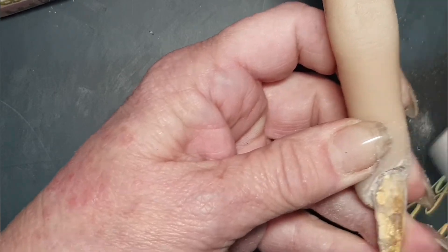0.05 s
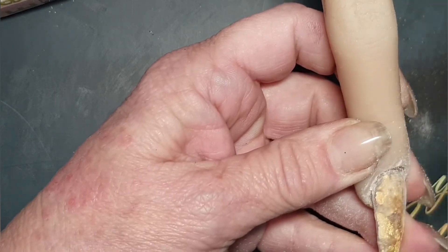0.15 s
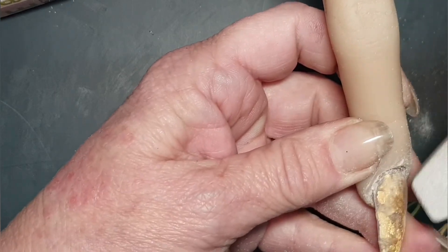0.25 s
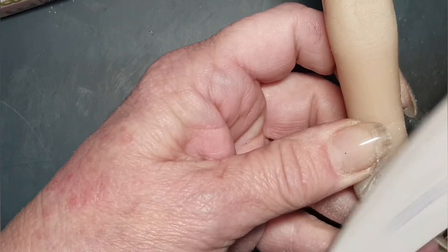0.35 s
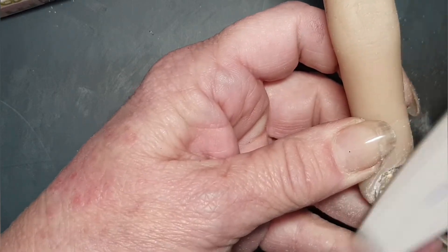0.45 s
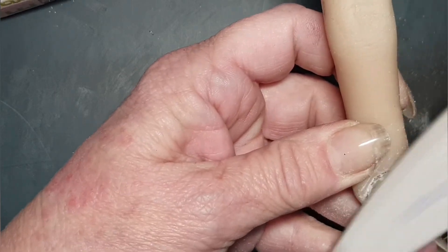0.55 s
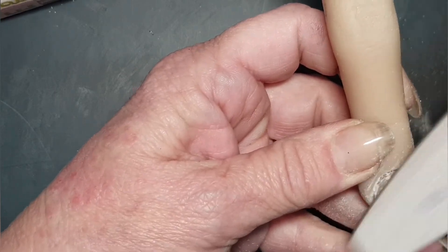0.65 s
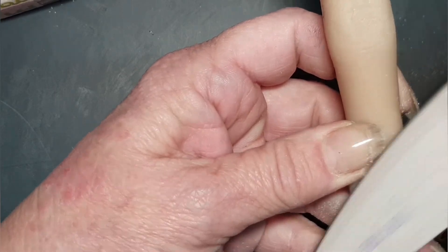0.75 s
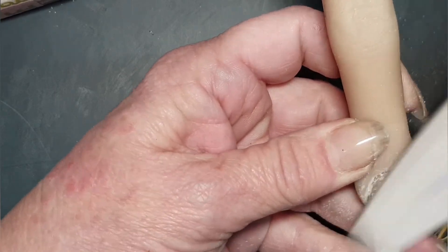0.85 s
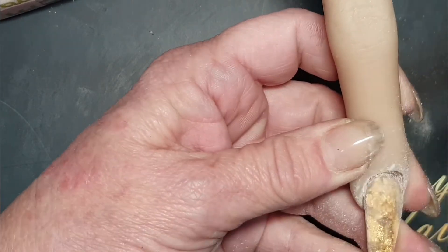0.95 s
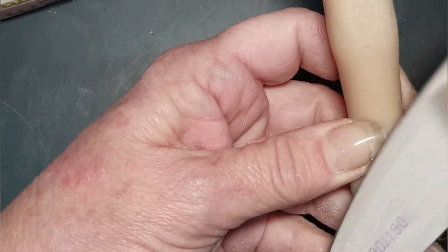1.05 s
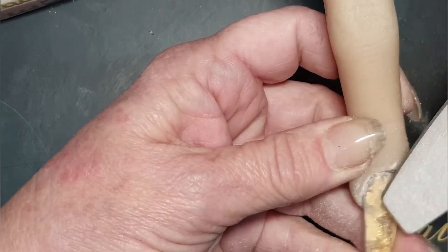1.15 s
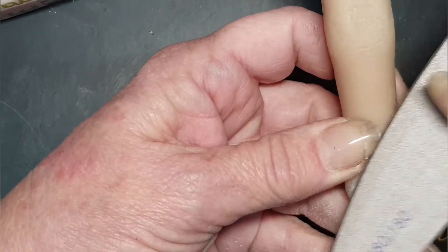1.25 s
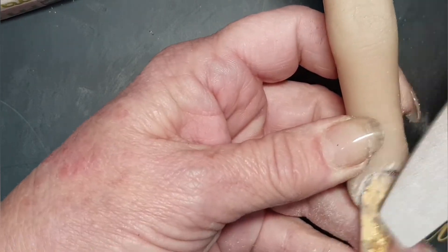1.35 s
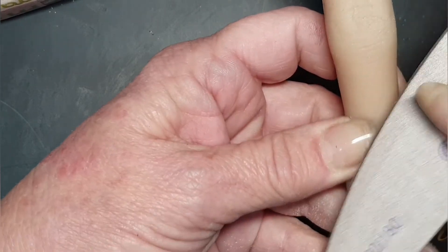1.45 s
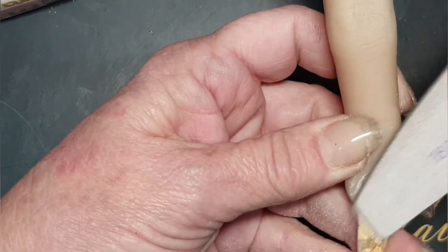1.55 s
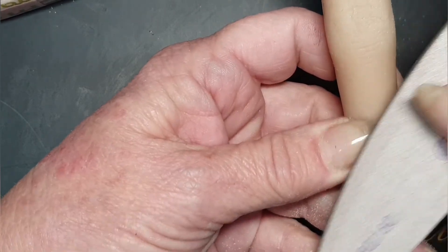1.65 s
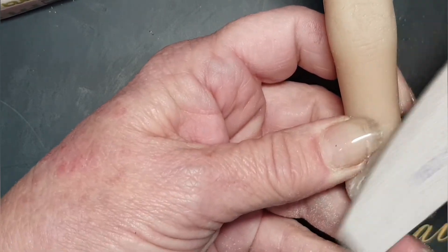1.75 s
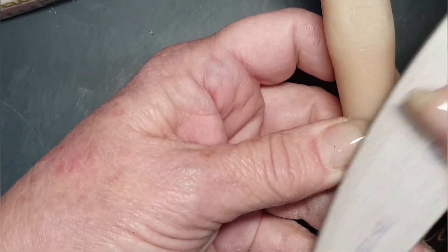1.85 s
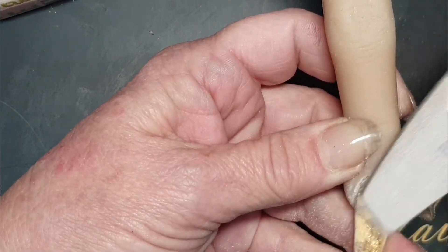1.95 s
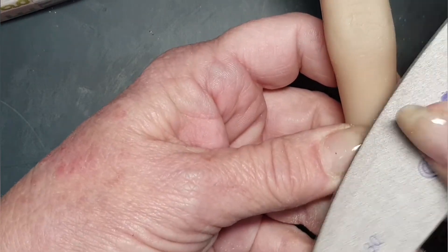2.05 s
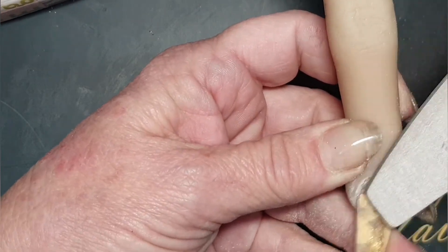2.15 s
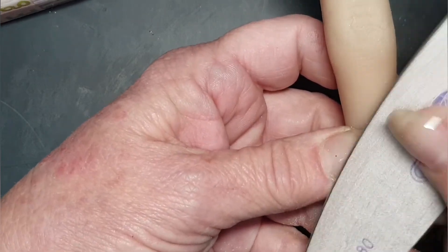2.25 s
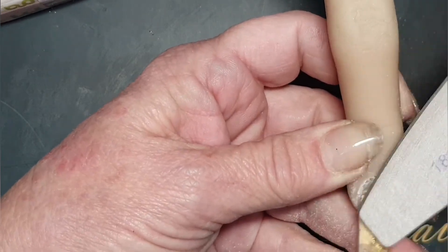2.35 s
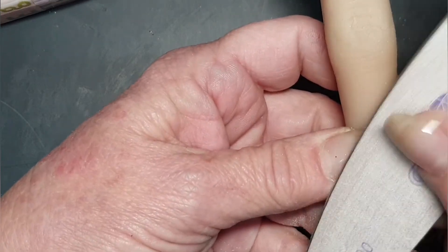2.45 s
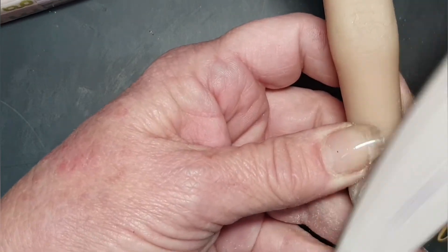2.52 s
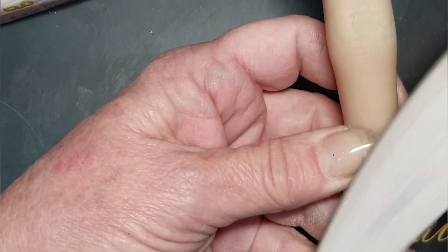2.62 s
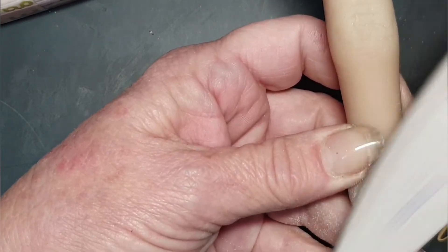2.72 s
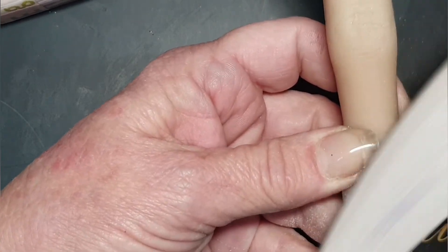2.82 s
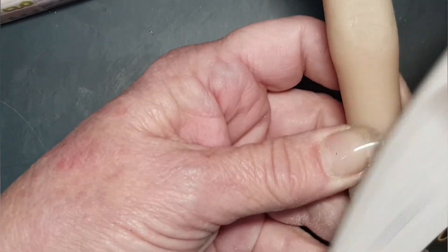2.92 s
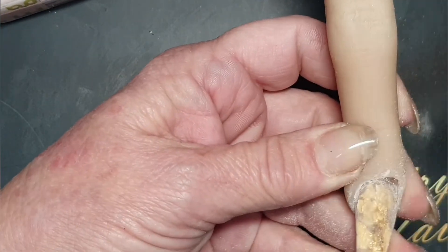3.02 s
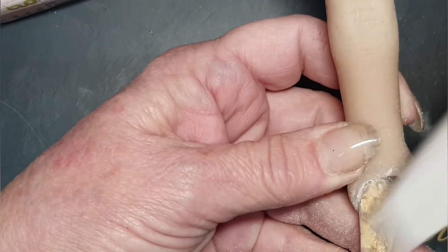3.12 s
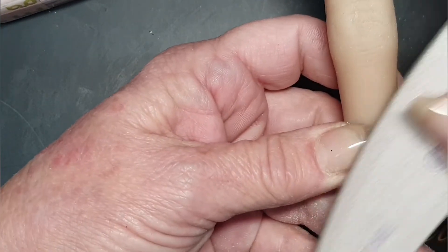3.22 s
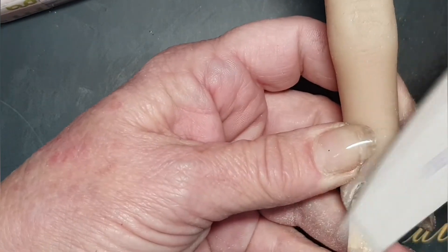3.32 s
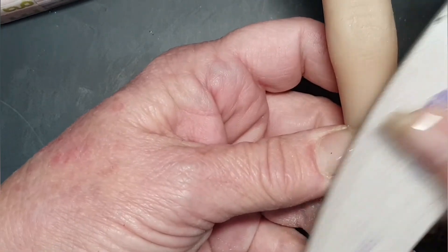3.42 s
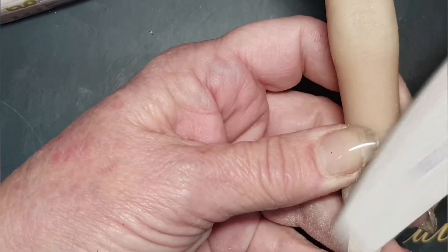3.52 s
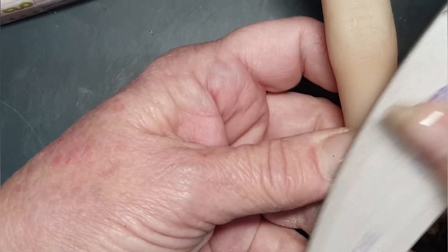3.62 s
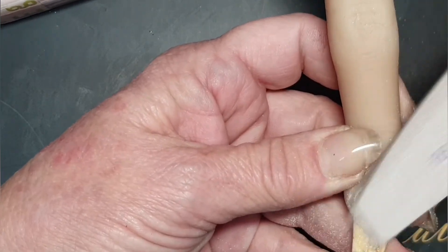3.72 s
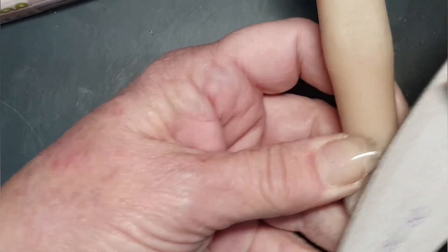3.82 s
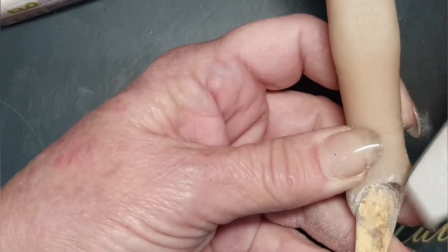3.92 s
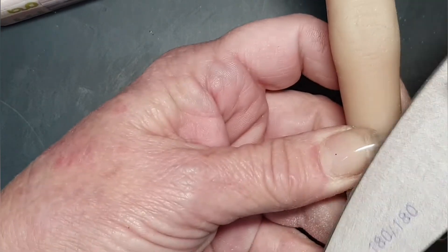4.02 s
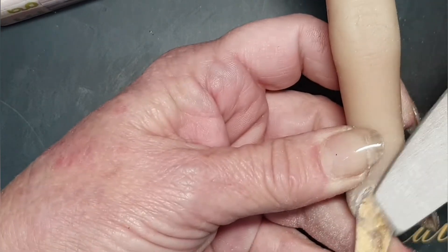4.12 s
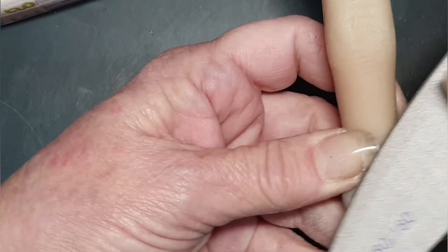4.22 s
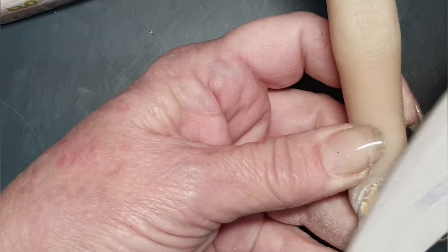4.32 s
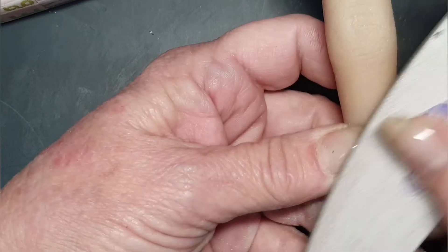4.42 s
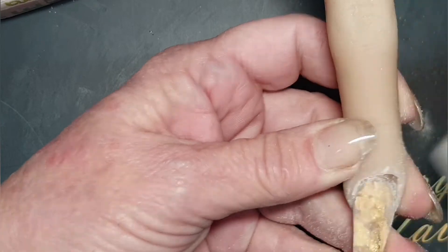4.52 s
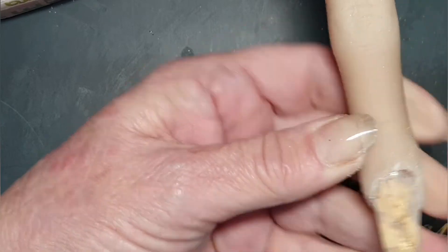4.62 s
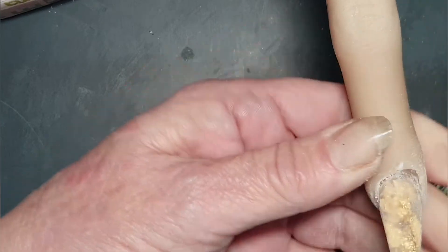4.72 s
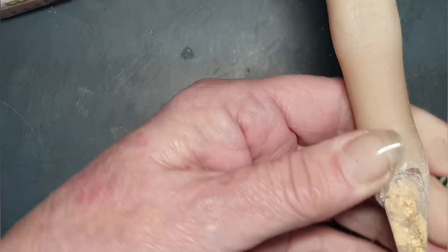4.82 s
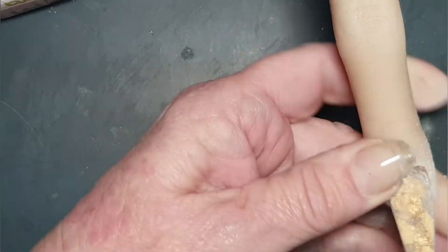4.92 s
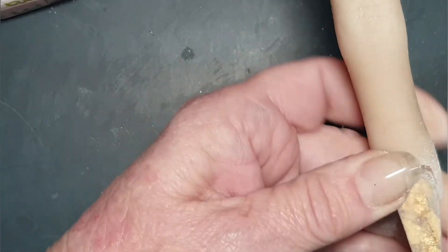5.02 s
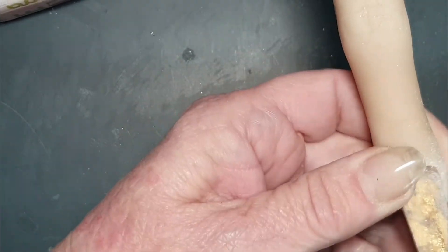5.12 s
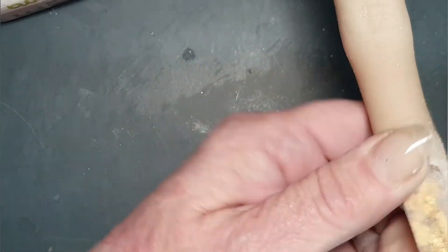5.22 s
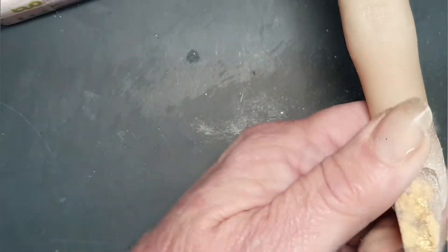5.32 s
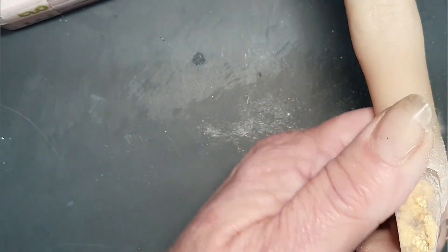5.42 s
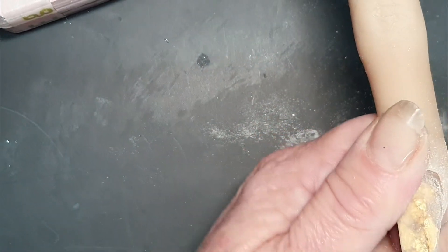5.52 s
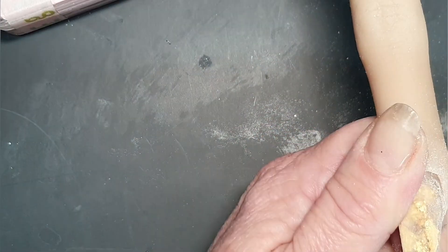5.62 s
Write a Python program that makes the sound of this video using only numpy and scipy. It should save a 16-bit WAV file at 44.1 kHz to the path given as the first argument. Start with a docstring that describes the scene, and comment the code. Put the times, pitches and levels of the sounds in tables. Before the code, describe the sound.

A hand file rasps in quick, short strokes across a hard acrylic nail, then a finger softly wipes it, in a small room.

```python
"""A fine hand file rasps to and fro, ten strokes a second, over an acrylic nail on a practice finger.
Friction is a stream of tiny collisions: the grit hisses, the resonances of nail and blade ring, and
the finger and its arm shudder in their low modes. Each run ends in a bright flick off the edge.
Then the hand shifts its grip and wipes the dust from the nail. A small room reverberates briefly."""
import sys
import numpy as np
from scipy import signal
from scipy.fft import rfft, irfft
from scipy.io import wavfile
from scipy.ndimage import map_coordinates

SR = 44100
rng = np.random.default_rng(int(sys.argv[2]) if len(sys.argv) > 2 else 0)


def dump_mix(stems):
    """Bounce the given channels to the path in sys.argv[1] as a 16-bit WAV at rate SR."""
    frames = np.atleast_2d(stems).T  # one column per channel
    limited = np.clip(frames, -1, 1)  # hard clip at full scale
    pcm = np.round(limited * 32767).astype(np.int16)
    wavfile.write(sys.argv[1], SR, pcm)


N = 250047
TIME = np.arange(N) / SR
BINS = np.maximum(np.fft.rfftfreq(N, 1 / SR), 1)

# file strokes, each lasting until the next turn or lift: start t/s, force level/dB
FILE_STROKES = [(.011, -41), (0.367, -46.5), (.466, -48.5), (0.57, -47), (0.669, -49), (.758, -47),
                (0.857, -44), (1.072, -47.5), (1.14, -44.5), (1.226, -44.5), (1.325, -44.5), (1.415, -44),
                (1.517, -43.5), (1.616, -44.5), (1.713, -43.5), (1.807, -45), (1.907, -43.5), (2.013, -43),
                (2.121, -42.5), (2.222, -43.5), (2.331, -43), (2.427, -44), (2.536, -43), (2.635, -44.5),
                (2.74, -44.5), (2.844, -43), (2.946, -42.5), (3.213, -48), (3.273, -43.5), (3.373, -41),
                (3.471, -41), (3.573, -45.5), (3.674, -43), (3.772, -47), (3.874, -46), (4.097, -54),
                (4.182, -48), (4.283, -51), (4.378, -46.5), (4.477, -43.5)]
# runs of strokes, each with its own hold on the file: lift t/s, flick level/dB,
# blade, nail, rasp and finger level/dB (four columns, relative to the force), arm sway level/dB
FILE_RUNS = [(.099, -33.5, -13, -8.5, -11, 1, -60.5), (0.941, -36.5, -35, -5.5, -7.5, -4.5, -56.5),
             (3.028, -29.5, -1.45, -8, -9.5, -4, -52), (3.95, -36.5, -4.5, -10, -11.5, -4.5, -49),
             (4.568, -33.5, -3.5, -11.5, -8, -2, -48)]
# dull knocks: t/s, f/Hz, level/dB, T60/s
KNOCKS = [(.020, 483, -36.5, 0.071), (0.02, 906, -44, 0.092), (0.037, 295, -23, 0.03),
          (0.251, 76.5, -49, 0.29), (2.12, 71.8, -48, 0.88), (2.137, 290, -32, 0.11),
          (3.489, 169, -36, 0.66), (4.676, 116.4, -33, 0.27), (5.282, 111, -52.5, 0.3)]
# hard little touches on the nail: t/s, peak level/dB
NAIL_TOUCHES = [(0.373, -35), (1.076, -40), (3.213, -44), (4.099, -49), (4.655, -57), (5.297, -50),
                (5.316, -51), (5.396, -56), (5.42, -53)]
# changes of grip: start t/s, end t/s, finger level/dB, arm sway level/dB
GRIP_SHIFTS = [(4.57, 4.77, -58.5, -48), (4.826, 4.931, -60.5, -50.5), (5.178, 5.35, -76.5, -56)]
# skin on the nail, hissing and squeaking: start t/s, end t/s, level/dB
SKIN_WIPES = [(4.6, 4.95, -65.5), (5.03, 5.13, -68.5), (5.194, 5.3, -66.5), (5.298, 5.58, -59.5)]
SKIN_SCUFFS = [(4.686, 4.828, -56), (4.811, 4.892, -50), (5.543, 5.597, -51.5)]

# resonances, sharpened where their response is raised to a power above 1: f/Hz, bandwidth/Hz, level/dB
BLADE_RESONANCES = [(7750, 430, 1), (8350, 320, -2.5), (9210, 307, -4.5)]
NAIL_MAIN_RESONANCES = [(3134, 230, 1.5), (3550, 290, -6)]
NAIL_UPPER_RESONANCES = [(4760, 280, -7.5), (5680, 430, -6)]
FINGER_RESONANCES = [(121.7, 10.4, -0.5), (160.5, 8.3, 2), (241.7, 53, -5.5), (321.8, 16.6, 1.5),
                     (483, 24.6, -9), (853, 250, -21)]
TOUCH_RESONANCES = [(5060, 3000, -11), (8000, 5000, 11), (14200, 4000, -6)]
SCUFF_RESONANCES = [(2500, 220, -2.5), (2840, 460, -1.5), (4910, 300, 3), (5940, 280, -1),
                    (7170, 460, -0.5), (9300, 1300, -8.5), (12800, 1600, -3), (15000, 2900, -0.5)]

# noise spectra: f/Hz, relative spectral density level/dB
GRIT_SPECTRUM = [(500, -60), (1300, -45), (2400, -10), (4000, -14.5), (6000, 2), (7000, 4.5), (9000, 3.5),
                 (10400, 4.5), (11500, 8), (13200, 9.5), (14200, 5), (15300, 12.5), (16000, -23)]
RASP_SPECTRUM = [(100, -10), (400, -27), (800, -1.5), (1300, -4.5), (2000, 0.5), (2400, 3), (3200, 5.5),
                 (4200, 3), (6000, 1.5), (9000, -1.5), (16000, -26)]
EDGE_SPECTRUM = [(500, -11), (1800, -24), (3200, -22), (6000, -10), (8000, -5), (10000, -3), (11500, 5),
                 (13400, 7.5), (16000, 1.5)]
SKIN_SPECTRUM = [(530, -46), (900, -20), (1260, -39), (2480, -13.5), (2960, -21), (3670, -12.5),
                 (4660, -10.5), (9290, -6), (15500, -10.5)]
BACKGROUND_SPECTRUM = [(18, -37), (30, -36), (88, -15), (112, -3.5), (194, -16), (311, -17), (512, -29),
                       (2610, -39), (4190, -32.5), (6720, -38.5), (8080, -39.5), (13300, -40), (16000, -86)]

# likeness of left and right: f/Hz, correlation coefficient
STEREO_CORRELATION = [(100, 0.8), (400, 1), (900, 0.33), (1600, 0.7), (2300, -0.22), (3150, 0.58),
                      (4200, 0.07), (5500, 0.18), (6400, -0.12), (7700, 0.85), (10000, 0.9), (13000, .9)]
# left minus right: f/Hz, level/dB
STEREO_BALANCE = [(70, 2), (140, -6.5), (320, -3), (520, 0), (1400, -6.5), (2000, -3.5), (3300, 3),
                  (4700, -3), (5900, -2.5), (7100, -0.5), (10500, 0), (14000, -1.5)]


def from_db(db):
    """Amplitude ratio: tenfold for every 20 dB."""
    return 10 ** (np.asarray(db) / 20)


def rms_one(x):
    """Normalisation to unit mean power."""
    return x / np.sqrt(np.mean(x ** 2) + 1e-20)


def at_bins(points):
    """Interpolation of a table over logarithmic frequency."""
    hz, value = np.transpose(points)
    return np.interp(np.log(BINS), np.log(hz), value)


def drift(rate_hz):
    """Low-pass noise: a smooth random fluctuation of unit power."""
    return rms_one(irfft(rfft(rng.standard_normal(N)) / (1 + (BINS / rate_hz) ** 2), N))


def resonances(modes):
    """Amplitude response of damped resonators whose powers add."""
    return np.sqrt(sum(from_db(db) ** 2 / (1 + ((BINS ** 2 - hz ** 2) / (BINS * width)) ** 2)
                       for hz, width, db in modes))


def friction(response, grain_db):
    """Countless collisions of uneven size make noise, filtered by a body; left and right partly agree."""
    sizes = from_db(grain_db * np.clip(drift(2500), -2.5, 2.5))
    mid, side = rfft(rng.standard_normal((2, N)) * sizes) * response
    alike = np.clip(at_bins(STEREO_CORRELATION), -1, 1)
    signs = np.array([[1], [-1]])
    spectra = np.sqrt(1 + alike) * mid + signs * np.sqrt(1 - alike) * side
    pair = irfft(spectra * from_db(signs * at_bins(STEREO_BALANCE) / 2), N)
    return pair / np.std(pair.mean(axis=0))


def delayed(x, lag_s):
    """Variable delay: a growing lag lowers every frequency, a shrinking lag raises it."""
    return np.array([map_coordinates(side, [(TIME - lag_s) * SR], order=3, mode="nearest") for side in x])


def lagged(level, lag_s):
    """First-order relaxation towards a changing level."""
    keep = np.exp(-1 / (lag_s * SR))
    return signal.lfilter([1 - keep], [1, -keep], level + 1e-18)


def gesture(start, end, attack_s=0.015, release_s=0.041):
    """Envelope with a linear rise, a hold and an exponential decay."""
    return np.clip((TIME - start) / attack_s, 0, 1) * np.exp(-np.maximum(TIME - end, 0) / release_s)


def wander(x, depth_db, width_hz, life_s):
    """Time-varying filtering: spectral peaks and hollows come and go as the contact moves."""
    hz, times, cells = signal.stft(x, SR, nperseg=256, noverlap=192)
    field = rng.standard_normal(cells.shape[1:]) + 0.5 * rng.standard_normal(cells.shape)
    across = signal.windows.gaussian(41, width_hz / hz[1])
    along = signal.windows.gaussian(81, life_s / times[1])
    field = signal.fftconvolve(field, np.outer(across, along)[np.newaxis], mode="same")
    gain = rms_one(from_db(depth_db * np.clip(rms_one(field), -3, 1.5)))
    return signal.istft(cells * gain, SR, nperseg=256, noverlap=192)[1][:, :N]


def strokes(turn_s=0.01024, thinning_db_per_s=1.47, scatter_db=0.55):
    """Reciprocating motion: pull (-1) and push (+1) alternate, and every run ends on a push."""
    last_lift = 0
    for lift, _, blade_db, nail_db, rasp_db, finger_db, _ in FILE_RUNS:
        run = [row for row in FILE_STROKES if last_lift <= row[0] < lift]
        ends = [start - turn_s for start, _ in run[1:]] + [lift]
        for k, ((start, force_db), end) in enumerate(zip(run, ends)):
            push = (len(run) - k) % 2
            thinned = thinning_db_per_s * (start - run[0][0])
            nail = nail_db - thinned - (2 if push else 0)  # a push damps the nail a little
            finger = finger_db - (0 if push else 5) - (5 if k == 0 else 0)
            bodies_db = np.array([blade_db, nail, finger]) + scatter_db * rng.standard_normal(3)
            levels_db = force_db + np.array([0, rasp_db - thinned, *bodies_db])
            fastest = start + (0.71 if end == lift else 0.44) * (end - start)
            yield start, fastest, end, 1 if push else -1, levels_db
        last_lift = lift


def stroke_motion(stick_s=0.004, bite_s=0.0034, release_s=0.0062, settle_s=0.021):
    """Static, then sliding friction: at each turn the file sticks, bites and gathers speed."""
    speed, contact, bite, place, direction = np.zeros((5, N))
    gains = np.zeros((5, N))
    for start, fastest, end, way, levels_db in strokes():
        span = (TIME > start) & (TIME < end)
        t = TIME[span]
        phase = np.pi * np.interp(t, [start, fastest, end], [0, 0.5, 1])
        speed[span] = np.sin(phase)
        sliding_s = np.maximum(t - start - stick_s, 0)
        contact[span] = np.minimum(sliding_s / bite_s, 1) * np.minimum((end - t) / release_s, 1)
        bite[span] = contact[span] * np.exp(-sliding_s / settle_s)
        direction[span] = way
        place[span] = np.cos(phase) * way  # +1 where a push begins, -1 where it ends
        gains[:, span] = from_db(levels_db)[:, np.newaxis]
    return speed, contact, bite, place, direction, gains


def grit_hiss(speed, contact, place):
    """Friction noise grows with sliding speed and is stronger towards the end of a push."""
    level = (0.035 * contact + speed ** 0.88) * from_db(-1.5 * place)
    return level * friction(from_db(at_bins(GRIT_SPECTRUM)), grain_db=2.5)


def blade_ring(speed, bite, detune):
    """Forced vibration: the sliding grit drives the blade's modes."""
    ring = friction(resonances(BLADE_RESONANCES) ** 1.15, grain_db=2.5)
    return (speed ** 1.26 + 0.12 * bite) * delayed(ring, 0.01346 * detune)


def nail_rasp(load, lingering=0.35):
    """Abrasion noise follows the load; a share lingers through each turn."""
    level = (1 - lingering) * load + lingering * lagged(load, lag_s=0.038)
    return level * friction(from_db(at_bins(RASP_SPECTRUM)), grain_db=1.0)


def nail_ring(place, grip, detune):
    """Modal excitation: the nail's modes speak or fade with the spot that the file touches."""
    main = friction(resonances(NAIL_MAIN_RESONANCES) ** 1.4, grain_db=3.0)
    ring = from_db(-2.5 + drift(47) + 1.5 * place) * delayed(main, 0.0066 * grip + 0.00583 * detune)
    for hz, width, db in NAIL_UPPER_RESONANCES:
        spot = rms_one(from_db(4.5 * np.clip(drift(10), -2, 1.5)))
        ring += from_db(db) * spot * friction(resonances([(hz, width, 0)]) ** 0.93, grain_db=8.0)
    return ring


def finger_shudder(drive, force, grip):
    """Forced vibration of the finger; its two lowest modes follow the force sluggishly."""
    body = delayed(friction(resonances(FINGER_RESONANCES[2:]) ** 1.184, grain_db=3.0), 0.04 * grip)
    heave = delayed(friction(resonances(FINGER_RESONANCES[:2]) ** 1.18, grain_db=3.0), 0.06 * grip)
    return drive * body + from_db(-8.5) * lagged(force, lag_s=0.015) * heave


def filing():
    """Sliding friction: speed drives hiss and blade; mere contact already excites nail and finger."""
    speed, contact, bite, place, direction, (force, coarse, blade, nail, finger) = stroke_motion()
    catch = drift(130)  # the grit catches and lets go
    detune = np.cumsum(direction) / SR  # blade and nail ring lower on the push than on the pull
    bright = force * grit_hiss(speed, contact, place) + blade * blade_ring(speed, bite, detune)
    bright *= from_db(1.2 * catch)
    # bending waves reflect from the blade's end, sooner or later with the place of contact
    bright += 0.25 * delayed(bright, 0.0014 + 0.000227 * place)
    press = (contact * (0.5 + 0.5 * speed ** 0.54) + 0.11 * bite) * from_db(0.73 * catch)
    rasp = nail_rasp(coarse * press)
    grip = np.cumsum(drift(9)) / SR  # the changing grip shifts the modes of nail and finger
    ring = nail * press * nail_ring(place, grip, detune)
    shudder = finger_shudder(finger * contact * (0.45 + 0.57 * speed), force * contact, grip)
    scrape = wander(bright + rasp, depth_db=3.2, width_hz=220, life_s=0.014)
    return scrape + ring, shudder


def arm_sway(rest_db=-58.5):
    """Amplitude of the arm's swing: runs of strokes, changes of grip and a resting hum add in power."""
    swings, last_lift = [], 0
    for lift, *_, db in FILE_RUNS:
        first = min(start for start, _ in FILE_STROKES if start >= last_lift)
        swings.append(from_db(db) * gesture(first, lift, attack_s=0.064, release_s=0.128))
        last_lift = lift
    swings += [from_db(db) * gesture(start, end) for start, end, _, db in GRIP_SHIFTS]
    return np.sqrt(from_db(rest_db) ** 2 + np.sum(np.square(swings), axis=0))


def arm_hum(sway_hz=73.7, waver_hz=2.2):
    """Resonance: the arm hums in its lowest mode, wavering in pitch and level."""
    phase = 2 * np.pi * np.cumsum(sway_hz + waver_hz * drift(13.8)) / SR
    hum = from_db(2.77 * drift(2.2)) * np.sin(phase)
    rumble = from_db(-9.0) * friction(resonances([(71, 41, 0)]) ** 2, grain_db=2)
    return arm_sway() * (hum + rumble)


def knocks():
    """Damped sinusoids, heard as dull knocks."""
    sound = np.zeros(N)
    for start, hz, db, t60 in KNOCKS:
        age = np.maximum(TIME - start, 0)
        envelope = from_db(db - 60 * age / t60) * (1 - np.exp(-age / 0.0038))
        sound += envelope * np.sin(2 * np.pi * hz * age)
    return sound


def edge_flicks(lead_s=0.0085, half_width_s=0.0048):
    """A friction transient: the file's edge slips off the nail just before the file lifts."""
    level = sum(from_db(db) * np.exp(-0.5 * ((TIME - lift + lead_s) / half_width_s) ** 4)
                for lift, db, *_ in FILE_RUNS)
    return level * friction(from_db(at_bins(EDGE_SPECTRUM)), grain_db=4.0)


def touches(decay_s=0.0018):
    """A brief impact has a broad spectrum: each touch on the nail is a short crack."""
    level = sum(from_db(db) * (TIME >= t) * np.exp(-np.abs(TIME - t) / decay_s) for t, db in NAIL_TOUCHES)
    return level * friction(resonances(TOUCH_RESONANCES), grain_db=0)


def finger_jostle():
    """Random excitation: the shifting hand knocks the finger's upper modes into vibration."""
    level = sum(from_db(db) * gesture(start, end) for start, end, db, _ in GRIP_SHIFTS)
    return level * friction(resonances(FINGER_RESONANCES[2:]) ** 1.11, grain_db=4.0)


def wipes():
    """Friction noise, modulated by small slips as skin slides over the dusty nail."""
    level = sum(from_db(db) * gesture(start, end, attack_s=0.049, release_s=0.046)
                for start, end, db in SKIN_WIPES)
    slips = from_db(2.0 * drift(110))
    return level * slips * friction(from_db(at_bins(SKIN_SPECTRUM)), grain_db=2.5)


def scuffs(edge_s=0.017, pitch_fall=0.071):
    """Dragging skin drives the nail's resonances into a squeak whose pitch sinks along each scuff."""
    level, sink = np.zeros((2, N))
    for start, end, db in SKIN_SCUFFS:
        gate = np.clip(np.minimum(TIME - start, end - TIME) / edge_s, 0, 1)
        level += from_db(db) * gate
        sink += gate * ((TIME - start) / (end - start) - 0.5)
    ring = friction(resonances(SCUFF_RESONANCES), grain_db=-5.0)
    squeak = delayed(ring, pitch_fall * np.cumsum(sink) / SR)
    return level * wander(squeak, depth_db=4, width_hz=180, life_s=0.02)


def room(x, t60_s, wet_db, correlation):
    """Reverberation: dense wall reflections decay exponentially, partly shared by left and right."""
    age = TIME[:SR // 2]
    shared, own = rng.standard_normal(len(age)), rng.standard_normal((2, len(age)))
    tail = np.sqrt(correlation) * shared + np.sqrt(1 - correlation) * own
    tail *= from_db(-60 * age / t60_s) * (age > 0.003)
    tail /= np.sqrt(np.sum(tail ** 2, axis=1, keepdims=True))
    return x + from_db(wet_db) * signal.fftconvolve(x, tail, axes=1)[:, :N]


def scene():
    """Superposition of filing and handling in the room, hum, knocks and a quiet background."""
    scrape, shudder = filing()
    wipe, jostle = wipes(), finger_jostle()
    surface = scrape + edge_flicks() + touches() + wipe + scuffs()
    highs = room(surface, t60_s=0.23, wet_db=-11.5, correlation=0.94)
    lows = room(shudder + jostle, t60_s=0.28, wet_db=-3.5, correlation=0.9)
    background = from_db(-69.5) * friction(from_db(at_bins(BACKGROUND_SPECTRUM)), grain_db=-1.0)
    direct = (arm_hum() + knocks()) * from_db([[-2], [2]])  # louder on the right
    return highs + lows + direct + background


def record(dry):
    """A steep low-pass filter removes the treble above 15.8 kHz."""
    return signal.sosfilt(signal.ellip(12, 0.1, 80, 15800, fs=SR, output="sos"), dry)


dry = scene()
out = record(dry)
dump_mix(out)
```